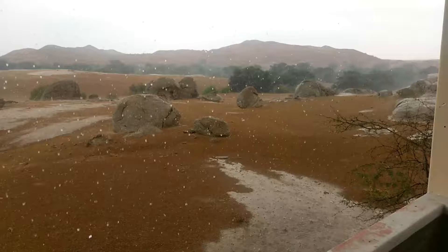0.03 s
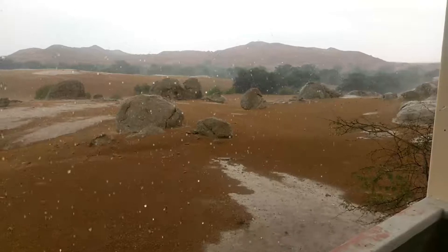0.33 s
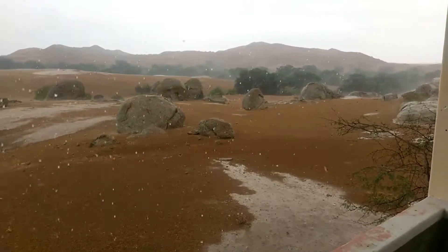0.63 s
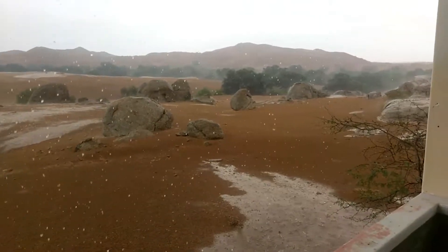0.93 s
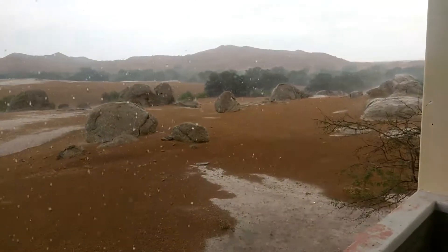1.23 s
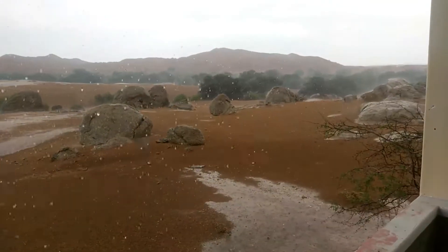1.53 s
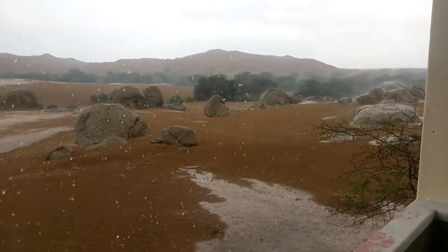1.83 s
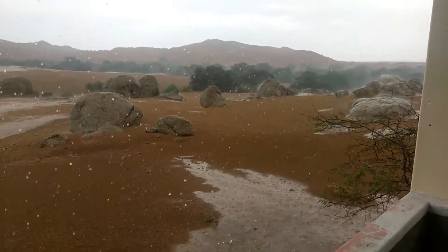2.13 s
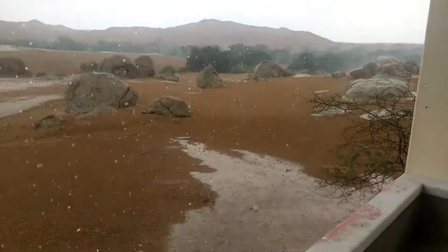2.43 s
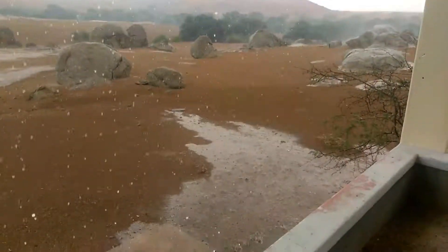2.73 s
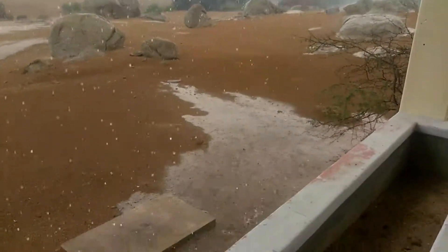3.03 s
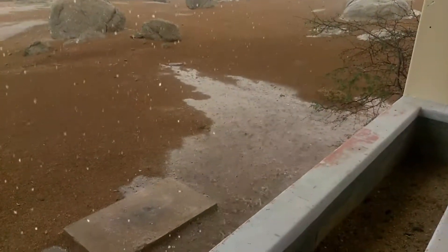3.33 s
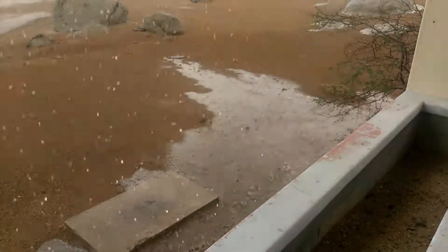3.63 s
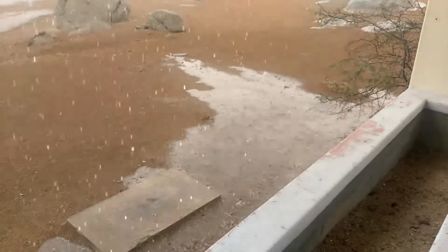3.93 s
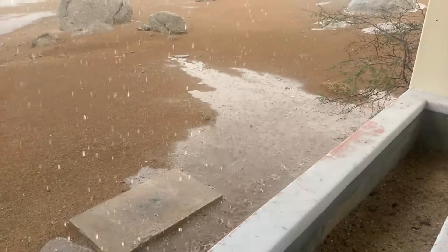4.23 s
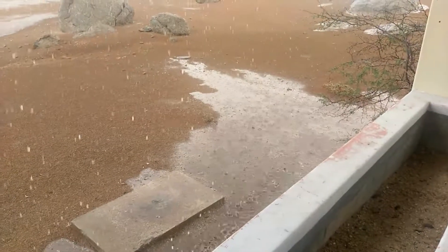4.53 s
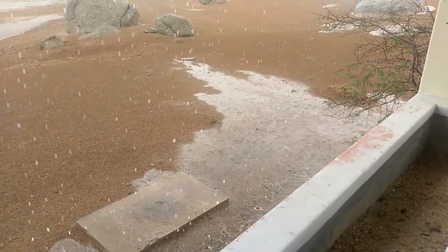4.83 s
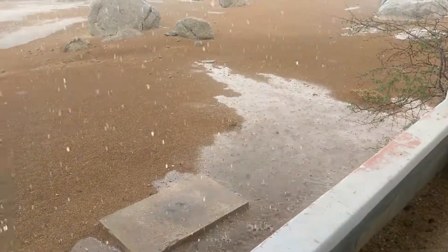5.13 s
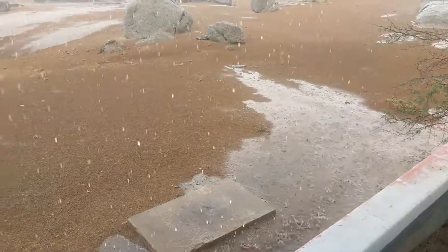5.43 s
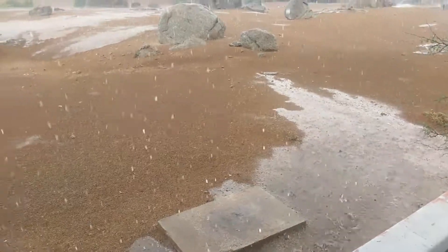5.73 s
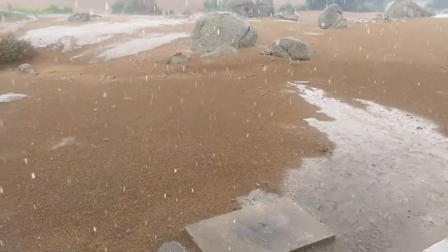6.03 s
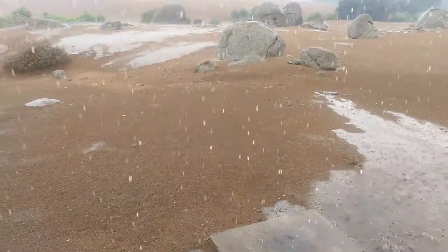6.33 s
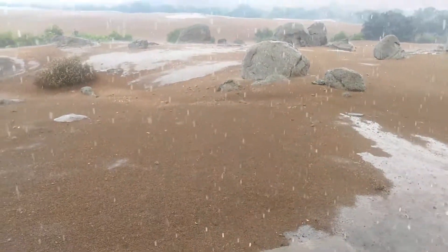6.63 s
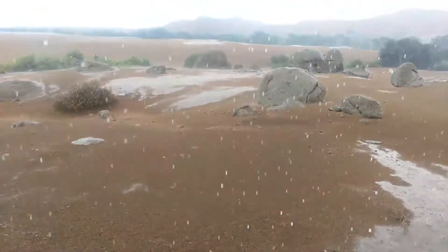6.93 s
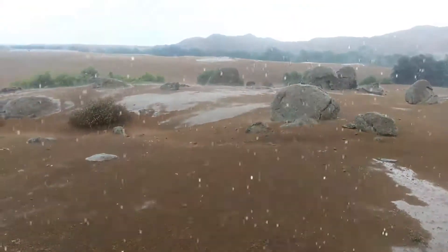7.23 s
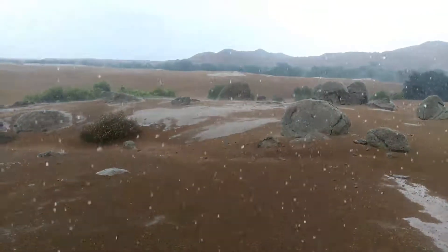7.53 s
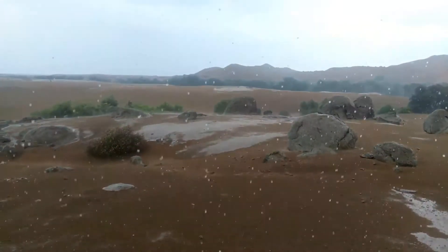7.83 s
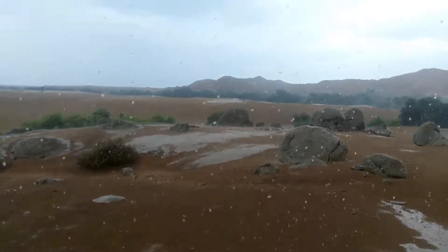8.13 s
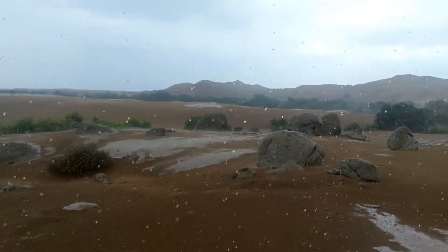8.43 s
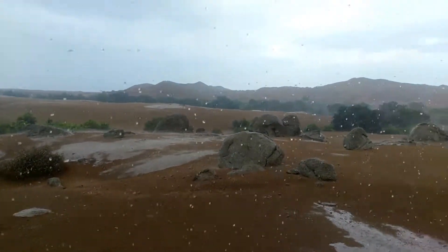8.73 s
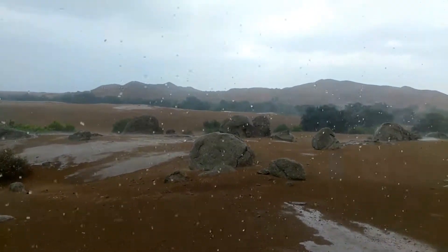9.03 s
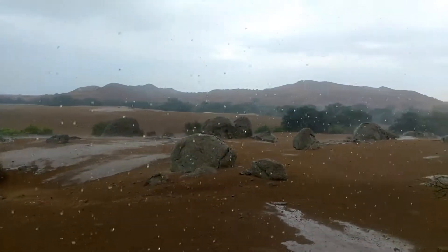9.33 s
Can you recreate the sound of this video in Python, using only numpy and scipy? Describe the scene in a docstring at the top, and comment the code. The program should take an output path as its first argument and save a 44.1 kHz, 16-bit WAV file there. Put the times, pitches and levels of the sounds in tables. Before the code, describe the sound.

A shower hisses and splashes on wet sandy ground while wind rumbles underneath and bumps the microphone, harder toward the end.

```python
"""Rain from a veranda

Steady rain fades in on open sand and puddles, heard through a phone's two microphone ports.
Far drops merge into a wash, near ones patter and spray, fat drips splat with an echo off the wall.
Wind rumbles low underneath and comes in gusts that buffet one port or the other."""
import sys
import numpy as np
from scipy import signal
from scipy.fft import rfft, irfft, next_fast_len
from scipy.io import wavfile
from scipy.ndimage import uniform_filter1d

SR = 44100
rng = np.random.default_rng(int(sys.argv[2]) if len(sys.argv) > 2 else 0)


def output_pcm(signal):
    """Save a mono or channel-first signal as 16-bit PCM at the path in sys.argv[1].

    Samples are clipped to [-1, 1] before scaling.
    """
    pcm = np.clip(np.atleast_2d(signal).T, -1, 1) * 32767
    wavfile.write(sys.argv[1], SR, np.round(pcm).astype(np.int16))


N = 414540
TIME = np.arange(N) / SR
ANTIPHASE = np.array([[1], [-1]])


def undb(db):
    """Decibels to gain."""
    return 10 ** (np.asarray(db) / 20)


def level(x, db=0):
    """Scale to an rms level."""
    return x * undb(db) / np.sqrt(np.mean(x ** 2) + 1e-20)


def eq(x, points, stretch=1):
    """Filter by a curve of (frequency [Hz], gain [dB]) points, its frequencies multiplied by stretch."""
    n = next_fast_len(x.shape[-1])
    hz, db = np.transpose(points)
    bins = np.maximum(np.arange(n // 2 + 1) * SR / n, 1)
    gain = undb(np.interp(np.log(bins), np.log(hz * stretch), db))
    return irfft(rfft(x, n) * gain, n)[..., :x.shape[-1]]


def drift(rate):
    """Smooth random modulation of rms 1, with rate new values a second."""
    hold = max(int(SR / rate), 1)
    steps = np.repeat(rng.standard_normal(N // hold + 1), hold)
    return level(uniform_filter1d(uniform_filter1d(steps, hold), hold)[:N])


def grain(spread_db, size, hold):
    """A rough gain that jumps at random every hold samples."""
    return undb(spread_db * np.repeat(rng.standard_normal(size // hold), hold))


def add(out, start_s, sound):
    """Mix a stereo sound in at start_s."""
    i = max(int(start_s * SR), 0)
    part = out[:, i:i + sound.shape[-1]]
    part += sound[:, :part.shape[-1]]


def port_levels(db, pan_db):
    """Left and right levels: the windward port gets it all, the sheltered one less."""
    return db + np.minimum([pan_db, -pan_db], 0)


# Bass-heavy tone of far wind: (frequency [Hz], gain [dB])
RUMBLE_EQ = [(20, -36), (40, -11), (62, -17), (95, 1.5), (160, -4), (250, -7), (400, -13), (900, -49)]

def far_wind():
    """Wind on the plain lays down a low, wavering rumble, mostly in antiphase."""
    air = rng.standard_normal(N) * ANTIPHASE + undb(-11.5) * rng.standard_normal((2, N))
    return level(eq(air, RUMBLE_EQ), -40.5) * undb(2 * drift(12))


# Soft, mid-heavy tone of far rain: (frequency [Hz], gain [dB])
WASH_EQ = [(100, -45), (250, -3), (450, -0.5), (850, 2), (1300, -4), (2000, -10.5), (4000, -12.5),
           (15000, -22)]

def far_rain():
    """Countless far drops merge into a wide wash: lows in antiphase, highs unrelated at the two ports."""
    lows = eq(rng.standard_normal(N), [(700, 0.5), (1100, -3.5), (1700, -38)]) * ANTIPHASE
    highs = eq(rng.standard_normal((2, N)), [(400, -10.5), (800, -1.5), (1300, 3.5)])
    return level(eq(lows + highs, WASH_EQ), -39.5) * undb(0.5 * drift(2.9))


# Dark tone of wind on a port, for gusts and buffets: (frequency [Hz], gain [dB])
TURBULENCE_EQ = [(20, -31), (42, -22), (65, -1.5), (110, 1.5), (160, -1), (230, -4.5), (330, -10.5),
                 (550, -18.5), (1000, -32.5), (2500, -45), (8000, -80)]
# Gust cues: (start [s], hold [s], left level [dB], right level [dB])
GUST_CUES = [(0.591, .19, -34.5, -43), (1.75, 0.74, -38, -41), (4.97, 0.36, -38.5, -42),
             (5.793, 0.22, -29.5, -50), (6.732, 0.27, -30.5, -27.5), (6.996, .32, -27.5, -31.5),
             (7.387, 1.17, -36, -39.5), (8.678, 0.584, -37, -28.5)]

def gusts(rise_s=0.05, fall_s=0.076, breeze_start_s=0.495, puff_db=5.5, flutter_db=7):
    """A light breeze puffs and flutters at each port; brighter gusts rise over it, hold and die away."""
    power = np.zeros((2, N))
    for start, hold_s, *port_db in GUST_CUES:
        end = start + hold_s
        swell = np.interp(TIME, [start - rise_s, start, end, end + fall_s], [0, 1, 1, 0])
        power += (undb(port_db)[:, None] * swell) ** 2
    onset = np.clip((TIME - breeze_start_s) / rise_s, 0, 1)
    breeze = undb([[-43.5], [-46.5]]) * onset * undb(puff_db * np.tanh(drift(9)))
    flutter = undb(flutter_db * np.tanh([drift(35), drift(35)]))
    dark, bright = [level(eq(rng.standard_normal((2, N)) * flutter, TURBULENCE_EQ, stretch), -1.77)
                    for stretch in (0.78, 0.93)]
    return breeze * dark + np.sqrt(power) * bright


# Buffet cues: (centre time [s], width [s], level [dB], left minus right [dB])
BUFFET_CUES = [(0.498, 0.028, -29, 24.5), (.616, 0.023, -26, 16.5), (1.355, .034, -31.5, 4),
               (2.2, 0.05, -31, 12), (2.445, 0.031, -30, 4), (2.627, 0.021, -29, -5),
               (3.763, 0.021, -28.5, 16), (4.09, 0.049, -26.5, 16), (4.626, .028, -27, 12),
               (5.014, 0.071, -20.5, 19), (5.229, .033, -20, 14), (5.431, 0.053, -28.5, 0),
               (5.796, 0.025, -25.5, 20), (5.923, 0.022, -17.5, 21), (6.457, 0.044, -27.5, 3),
               (6.947, 0.03, -16, 3.5), (7.187, 0.034, -23, 8), (7.434, 0.03, -18, 10),
               (7.651, 0.045, -21, 14), (7.986, 0.033, -24.5, -18), (8.79, 0.12, -29, -15),
               (9.148, .04, -16, -8)]

def buffets(db_per_octave=42, size=8192):
    """Short, ragged bursts of turbulence hit the ports, brighter when stronger."""
    t, out = (np.arange(size) - size / 2) / SR, np.zeros((2, N))
    for centre_s, width_s, windward_db, pan_db in BUFFET_CUES:
        swell = np.exp(-(1.25 * t / width_s) ** 2)
        eddies = grain(spread_db=6, size=size, hold=128)
        puffs = []
        for db in port_levels(windward_db, pan_db):
            burst = rng.standard_normal(size) * swell * eddies
            brightness = 2 ** ((db + 27) / db_per_octave)
            puffs.append(level(eq(burst, TURBULENCE_EQ, brightness), db - 2.5))
        add(out, centre_s - size / 2 / SR, np.array(puffs) * np.sqrt(np.mean(swell ** 2)))
    return out


# Wind pop cues: (time [s], level [dB], snap pitch [Hz], left minus right [dB])
POP_CUES = [(.683, -17, 325, 25), (6.948, -19.5, 660, 20), (7.654, -17, 520, 17), (8.424, -24, 345, 15),
            (9.129, -16, 365, -28), (9.135, -11, 800, -20), (9.3086, -7.5, 580, 37)]

def wind_pops(thud_hz=150, thud_s=0.0072, thud_db=-4, size=3000):
    """A sharp eddy gives one swing of pressure, then a low thud as the port settles."""
    t, out = np.arange(size) / SR, np.zeros((2, N))
    for start, db, hz, pan_db in POP_CUES:
        phase = 2 * np.pi * hz * t - np.pi
        snap = phase * np.exp((1 - phase ** 2) / 2)
        thud = np.sin(2 * np.pi * thud_hz * t) * np.exp(-t / thud_s) * (1 - np.exp(-t * hz))
        add(out, start, undb(port_levels(db, pan_db))[:, None] * (snap + undb(thud_db) * thud))
    return out


def drops(rate, spread_db, cap_db, splash_s, splash_db, range_hz, octaves, grounds=7):
    """Drops land on grounds of differing pitch: a tick, then a brief splash of droplets."""
    out, decay = np.zeros((2, N)), np.exp(-2 / (splash_s * SR))
    for hz in np.geomspace(*range_hz, grounds):
        hits = np.flatnonzero(rng.random(N) < rate / grounds / SR)
        accent_db = np.minimum(spread_db * rng.exponential(size=N), cap_db)
        sizes = undb(accent_db[hits]) * rng.choice([-1, 1], N)[hits]
        lags = rng.integers(-22, 23, N)[hits]  # samples: a tick reaches one port first
        ticks = np.array([np.bincount(hits, sizes, N), np.bincount((hits + lags) % N, sizes, N)])
        envelope = np.sqrt(signal.lfilter([1 - decay], [1, -decay], ticks ** 2 + 1e-12))
        splash = envelope * rng.standard_normal((2, N))
        band = [(hz / 4 ** octaves, -18), (hz / 2 ** octaves, -5), (hz, 0),
                (hz * 2 ** octaves, -5), (hz * 4 ** octaves, -18)]
        out += eq(ticks + undb(splash_db) * splash, band)
    return out


# Fader ride of the slowly thickening shower: (time [s], patter level [dB], spray level [dB])
SHOWER_RIDE = [(.9, -40, -46.5), (1.9, -39, -42.5), (3.0, -37.5, -44.5), (4.4, -39, -44), (6.3, -39, -43.5),
               (6.9, -38.5, -41), (9.1, -37, -40)]
# Crisp tone of near drops: (frequency [Hz], gain [dB])
PATTER_EQ = [(300, -49), (800, -9.5), (1400, 3), (2200, -2), (3000, -2.5), (4200, -1.5), (6000, -3.5),
             (8000, -6), (12000, -14), (16000, -37)]
# Airy fizz of fine spray: (frequency [Hz], gain [dB])
SPRAY_EQ = [(2000, -49), (5000, 4), (7500, -0.5), (10000, 0.5), (12000, -2.5), (14000, -11), (16000, -8.5)]

def near_rain():
    """Near drops patter in flurries; heavy ones splash, some tick on stone, the finest fizz on top."""
    times, *faders = np.transpose(SHOWER_RIDE)
    patter_db, spray_db = [np.interp(TIME, times, fader) for fader in faders]
    flurry_db = 0.72 * drift(18) + 0.37 * drift(5.5)
    patter = drops(rate=2600, spread_db=2, cap_db=20, splash_s=0.01, splash_db=3.5,
                   range_hz=(710, 12200), octaves=0.88)
    heavy = drops(rate=170, spread_db=3, cap_db=6.5, splash_s=0.02, splash_db=9,
                  range_hz=(3130, 8000), octaves=0.19)
    stone = drops(rate=90, spread_db=4.5, cap_db=10, splash_s=0.003, splash_db=0,
                  range_hz=(3800, 11000), octaves=0.4)
    spray = drops(rate=3000, spread_db=1, cap_db=19, splash_s=0.0093, splash_db=2,
                  range_hz=(5300, 15900), octaves=0.45)
    ground = level(eq(patter, PATTER_EQ), -2.68) + level(eq(heavy, PATTER_EQ), -6) + level(stone, -14)
    fizz = level(eq(spray, SPRAY_EQ))
    return ground * undb(patter_db + flurry_db) + fizz * undb(spray_db + 0.61 * flurry_db)


# Close drip cues: (time [s], level [dB], band centre [Hz], splash length [s])
DRIP_CUES = [(2.616, -40.5, 3250, .015), (2.822, -33, 3050, 0.019), (2.947, -37.5, 4700, .016),
             (4.145, -34, 4700, 0.02), (4.746, -33, 4500, .007), (4.828, -39, 4300, .033),
             (5.593, -33.5, 4460, .018), (5.862, -34.5, 3900, .013), (6.479, -31.5, 4000, 0.0076),
             (6.836, -40.5, 3800, 0.09), (7.179, -33.5, 6400, 0.017), (7.926, -32, 7000, .0055),
             (8.075, -31, 5490, .02), (8.195, -31.5, 5400, .006), (8.393, -33.5, 3600, 0.023),
             (8.644, -39.5, 4800, .014), (8.905, -37, 6500, .014), (8.963, -31.5, 3960, 0.0088),
             (9.002, -35, 4100, .012), (9.239, -36, 3700, .017)]

def fat_drips(octaves=0.43, crack_s=0.00061, echo_s=0.0078, tail_s=0.15, size=9000):
    """A fat drip cracks on wet ground, throws droplets for a moment, and slaps back off the wall."""
    t, out = np.arange(size) / SR, np.zeros((2, N))
    for start, db, hz, splash_s in DRIP_CUES:
        crack = undb(-3) * np.exp(-t / crack_s)
        droplets = grain(spread_db=4, size=size, hold=50) * np.exp(-(t / splash_s) ** 2)
        slap = undb(-8) * np.exp(-abs(t - echo_s) / crack_s)
        tail = undb(-14) * np.exp(-t / tail_s)
        envelope = crack + droplets + (t > echo_s) * (slap + tail)
        band = [(hz / 16, -45), (hz / 8 ** octaves, -15), (hz / 2 ** octaves, -2), (hz, 0),
                (hz * 2 ** octaves, -3), (hz * 6 ** octaves, -22), (hz * 8, -50)]
        add(out, start, envelope * level(eq(rng.standard_normal((2, size)), band), db - 0.7))
    return out


# Left port, nearly flat with one narrow notch: (frequency [Hz], gain [dB])
LEFT_EQ = [(100, -1.5), (3700, 0.5), (4050, 1), (4170, -24), (4330, 1), (16000, 2.5)]
# Right port, with a cavity resonance near 4 kHz: (frequency [Hz], gain [dB])
RIGHT_EQ = [(100, 2.3), (500, 5.33), (800, 3.1), (1300, 3.6), (2200, 5.14), (2800, 7.4), (3700, 10),
            (4400, 9.7), (5100, 6.7), (6000, 3.5), (9500, 2.2), (12000, 2.5), (14000, 11), (15500, 8.2)]

def scene():
    """Each port colours the rain and far wind; the close wind acts on the ports directly."""
    left, right = far_rain() + far_wind() + near_rain() + fat_drips()
    return np.array([eq(left, LEFT_EQ), eq(right, RIGHT_EQ)]) + gusts() + buffets() + wind_pops()


def record(dry, fade_start_s=0.21, fade_s=0.29, low_hz=32, top_hz=15800):
    """Fade in, thin the deepest bass and cut the top."""
    faded = dry * np.clip((TIME - fade_start_s) / fade_s, 0, 1)
    thinned = signal.sosfilt(signal.butter(2, low_hz, "high", fs=SR, output="sos"), faded)
    return signal.sosfilt(signal.ellip(14, 0.1, 70, top_hz, fs=SR, output="sos"), thinned)


dry = scene()
out = record(dry)
output_pcm(out)
```